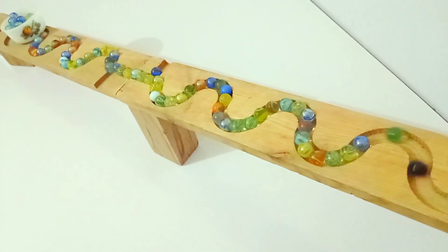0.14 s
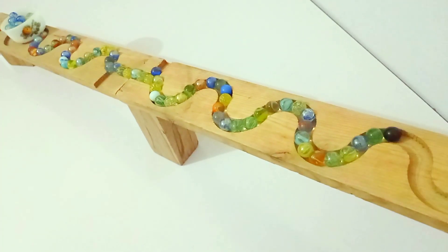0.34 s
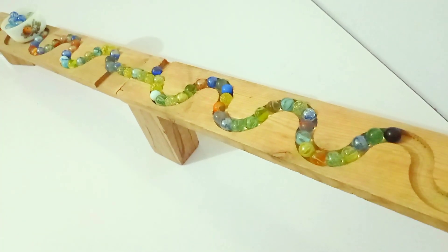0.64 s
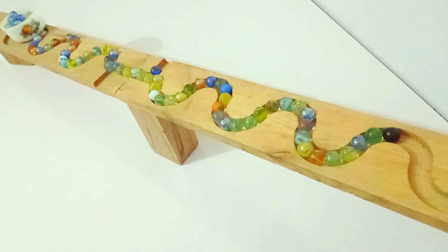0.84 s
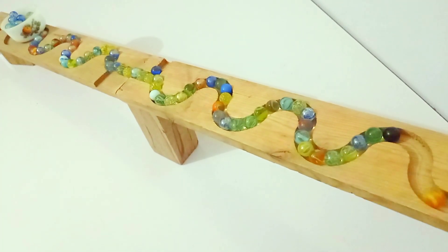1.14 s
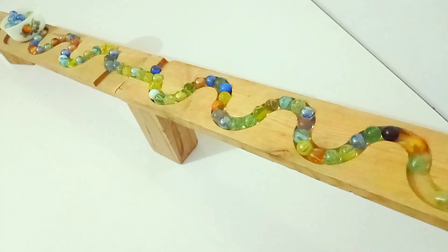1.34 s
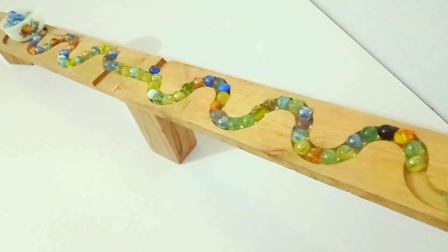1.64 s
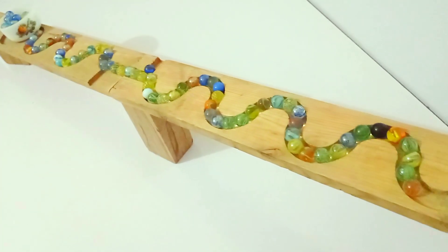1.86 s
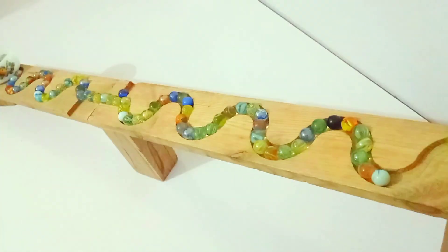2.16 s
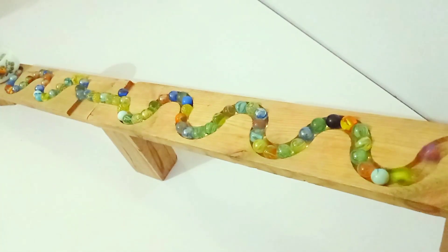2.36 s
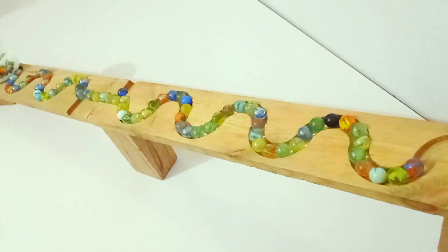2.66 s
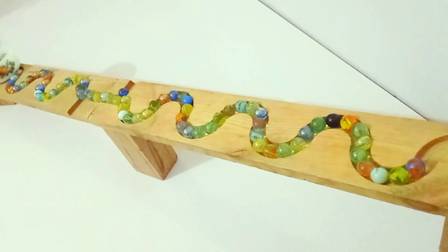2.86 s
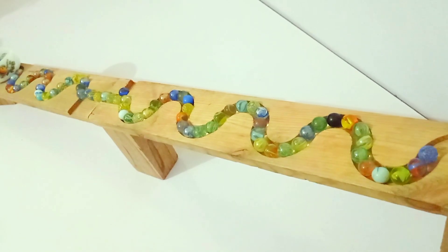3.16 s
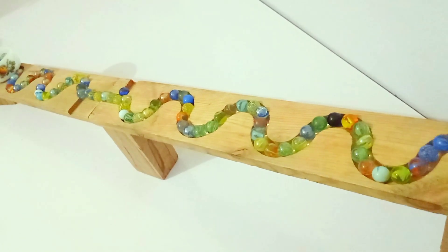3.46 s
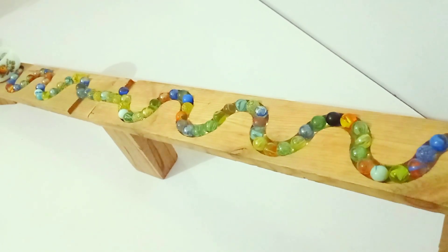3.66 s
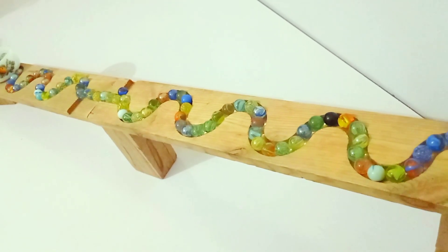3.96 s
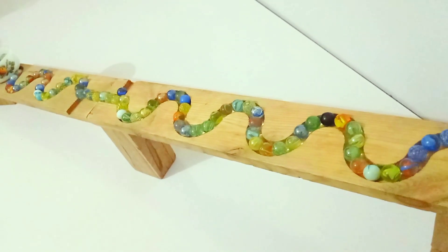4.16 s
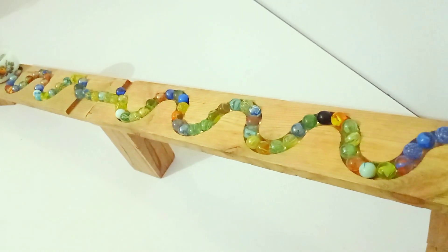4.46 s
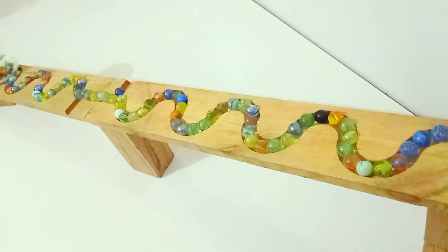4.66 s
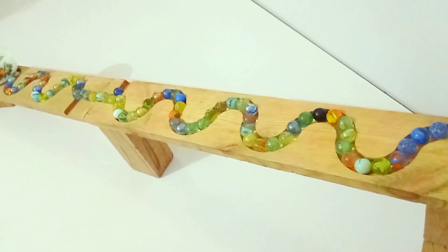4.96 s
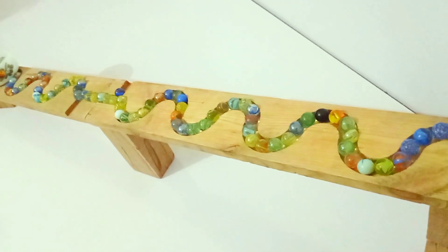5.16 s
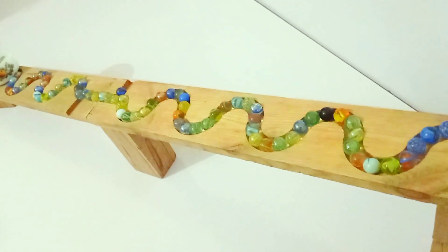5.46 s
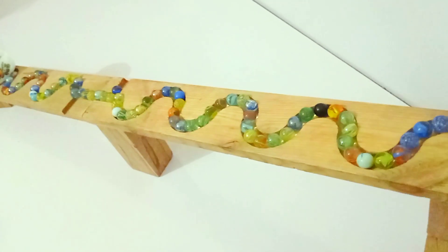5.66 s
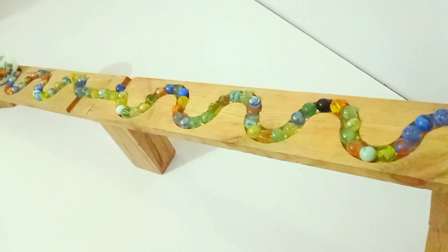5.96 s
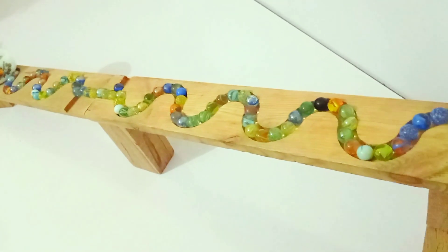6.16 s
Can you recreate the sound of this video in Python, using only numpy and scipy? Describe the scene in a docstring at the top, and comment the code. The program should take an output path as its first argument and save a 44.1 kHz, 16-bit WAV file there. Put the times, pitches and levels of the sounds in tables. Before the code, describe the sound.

Glass marbles rumble down a winding wooden groove, knocking through bends and clicking into a waiting row, before one hard clatter in a small live room.

```python
"""A small live room: glass marbles run down a winding groove in a wooden plank.
Random bumps of the grain make each run rumble; knocks in the bends ring decaying modes of the plank,
and short filtered noise bursts and snaps click where glass meets the waiting row, which then jostles.
A hard clatter ends the run. Dry bouncing ticks, a soft thud, a low rumble, a passing hum, a faint boom
and a thin hiss complete the scene."""
import sys
import numpy as np
from scipy import signal
from scipy.fft import rfft, irfft, next_fast_len
from scipy.io import wavfile
from scipy.ndimage import map_coordinates

SR = 44100
rng = np.random.default_rng(int(sys.argv[2]) if len(sys.argv) > 2 else 0)


def unload_wav(signal):
    """Save mono or channel-first audio to the path in sys.argv[1] as 16-bit WAV at rate SR, clipped to [-1, 1]."""
    wavfile.write(
        sys.argv[1],
        SR,
        np.round(np.clip(np.atleast_2d(signal).T, -1, 1) * 32767).astype(np.int16),
    )


N = 278271

# frequency balance of the room's answer: frequency_hz, level_db
WALL_SPECTRUM = [(300, 2), (700, 2.5), (2500, -1.5), (4000, -5.5), (6500, -3.5), (9000, -6), (12000, -8),
                 (15000, -13.5)]
# each marble's roll from a bend until it meets the row: start_s, end_s, start_level_db
ROLL_RUNS = [(0.585, 1.43, -54.5), (0.697, 1.47, -45), (1.203, 1.84, -51), (1.253, 2, -45.5),
             (2.149, 2.437, -52), (2.426, 2.6, -51.5), (2.7, 3.071, -54), (3.099, 3.5, -53),
             (3.54, 3.765, -51), (4.172, 4.531, -49), (4.422, 4.67, -61)]
# from here on the plank rings with a different set of mode strengths
LATER_MODES_S = 2.15


def amp(db):
    """Level law: 20 dB is a factor of ten in amplitude."""
    return 10 ** (np.asarray(db) / 20)


def unit(x):
    """Power normalisation: scale a steady sound to rms 1."""
    return x / np.sqrt(np.mean(x ** 2) + 1e-20)


def blow(x):
    """Energy normalisation: scale a short sound to the energy of one millisecond at rms 1."""
    return x / np.linalg.norm(x) * np.sqrt(SR / 1000)


def along(points, hz):
    """Interpolation of (frequency_hz, value) points on a logarithmic frequency axis."""
    f, v = np.transpose(points)
    return np.interp(np.log(hz + 1), np.log(f + 1), v)


def curve(rows, outside=None):
    """Linear interpolation of (time_s, value) rows to one value per sample."""
    return np.interp(np.arange(N) / SR, *np.transpose(rows), left=outside, right=outside)


def wobble(knots_per_s):
    """Slow random modulation: a smooth curve through Gaussian knots."""
    knots = rng.standard_normal(int(N * knots_per_s / SR) + 4)
    return map_coordinates(knots, [np.arange(N) * knots_per_s / SR])


def colour(x, spectrum, tilt=0):
    """Minimum-phase filtering: a folded cepstrum makes the spectrum, tilted in dB per octave, causal."""
    size = 2 * next_fast_len(len(x) // 2 + 2048)
    hz = np.fft.rfftfreq(size, 1 / SR)
    # the tilt pivots at 2 kHz and levels off outside 500 Hz to 9 kHz
    db = along(spectrum, hz) + tilt * np.log2(np.clip(hz, 500, 9000) / 2000)
    cepstrum = irfft(np.log(amp(db)))
    cepstrum[1:size // 2] *= 2
    cepstrum[size // 2 + 1:] = 0
    response = np.exp(rfft(cepstrum))
    return irfft(rfft(x, size) * response, size)[:len(x)]


def burst(rise, t60):
    """Transient excitation: noise that swells over rise and decays by 60 dB in t60 (both in seconds)."""
    t = np.arange(SR // 8) / SR
    swell = 1 - np.exp(-(t / rise) ** 2)
    return rng.standard_normal(len(t)) * swell * amp(-60 * t / t60)


def bumps(per_s, spread_db):
    """Random impact train: tiny impulses at random moments, of uneven size and either sign."""
    size = amp(spread_db * np.clip(rng.standard_normal(N), -2, 2)) * rng.choice([-1, 1], N)
    return (rng.random(N) < per_s / SR) * size


def room(x, wet_db, walls_db=-5, build=0.02):
    """Reverberation: the direct sound, six early reflections and a diffuse tail building over build s."""
    # reverberation time by band: frequency_hz, t60_s
    band_t60 = [(200, 0.24), (700, 0.32), (2000, 0.33), (6000, 0.34), (9000, 0.27), (15000, 0.19)]
    hz, t, z = signal.stft(rng.standard_normal(SR // 2), SR, nperseg=256)
    decay = amp(-60 * t / along(band_t60, hz)[:, None])
    tail = signal.istft(z * decay * (1 - np.exp(-(t / build) ** 2)), SR)[1]
    answer = tail / np.linalg.norm(tail)
    delays = (rng.uniform(.011, .034, size=6) * SR).astype(int)
    answer[delays] += amp(walls_db) / np.sqrt(len(delays))
    answer = amp(wet_db) * colour(answer, WALL_SPECTRUM)
    answer[0] += 1  # direct sound
    return signal.fftconvolve(x, answer)


def add(track, s, x):
    """Superposition: mix x into the track at time s."""
    start = max(round(s * SR), 0)
    track[start:start + len(x)] += x[:max(N - start, 0)]


def hiss():
    """Stationary filtered noise: a steady thin hiss."""
    # hiss spectrum: frequency_hz, level_db
    air_spectrum = [(200, -15), (340, -6), (450, -11), (700, -9.5), (800, 3), (950, -7), (1450, -2.5),
                    (1800, -7), (2200, -13), (2900, -14.5), (3700, -24.5), (5000, -27), (6200, -3),
                    (7000, -35), (9000, -55)]
    return amp(-62.5) * unit(colour(rng.standard_normal(N), air_spectrum))


def rumble():
    """Amplitude-modulated low-frequency noise: an uneven rumble."""
    # rumble level: time_s, level_db
    rumble_level = [(0, -72), (2.12, -63), (2.19, -55), (5.32, -56), (5.44, -68), (5.58, -55.5),
                    (6.2, -55.5), (6.31, -71)]
    # rumble spectrum: frequency_hz, level_db
    low_spectrum = [(20, -34), (32, -24.5), (42, -7), (58, 0), (80, -4), (105, -1.5), (130, -7.5),
                    (175, -21), (260, -40), (450, -69.5)]
    wander_db = 1
    level_db = curve(rumble_level) + wander_db * wobble(7)
    return amp(level_db) * unit(colour(rng.standard_normal(N), low_spectrum))


def hum():
    """Phase integration of a slightly wavering frequency: a hum that swells and fades."""
    # hum level, silent outside the listed times: time_s, level_db
    hum_level = [(3.1, -95), (3.8, -54.5), (4.3, -51.5), (4.7, -53), (5.3, -58), (5.5, -100)]
    hum_hz = 54.2 + .5 * wobble(1.444)
    tone = np.sqrt(2) * np.sin(2 * np.pi * np.cumsum(hum_hz) / SR)
    return amp(curve(hum_level, outside=-np.inf)) * tone


def boom():
    """Low-frequency structural vibration: noise as a faint, lumpy boom of the plank swaying on its legs."""
    # boom spectrum: frequency_hz, level_db
    boom_spectrum = [(40, -41.5), (70, -13.5), (95, 7.5), (115, 4.5), (140, -14), (220, -50)]
    base_db, wander_db = -71, 2.5
    sway_s, sway_width_s, sway_peak_db = 0.476, 0.051, 9  # one stronger sway
    sway_db = sway_peak_db * np.exp(-((np.arange(N) / SR - sway_s) / sway_width_s) ** 2)
    level_db = base_db + sway_db + wander_db * wobble(9)
    return amp(level_db) * unit(colour(rng.standard_normal(N), boom_spectrum))


def thud(s=2.088, db=-36):
    """Low-pass impact: one brief noise burst with little treble, heard as a soft bump."""
    # frequency_hz, level_db
    dull = [(150, -11), (350, 7), (520, 10), (700, 8), (1100, -12), (4000, -56)]
    track = np.zeros(N)
    bump = blow(colour(burst(rise=0.0012, t60=0.036), dull))
    add(track, s, room(amp(db) * bump, wet_db=-5))
    return track


def ticks(count=3):
    """Repeated lossy impact: dry ticks near the microphone bounce quickly, each bounce weaker."""
    # first ticks: start_s, level_db
    tick_events = [(0.6685, -31.5), (2.1566, -42), (2.303, -30), (2.3379, -40), (4.064, -30.5),
                   (4.128, -41.5), (4.1621, -38.5), (4.28, -31), (4.3458, -35.5), (4.461, -38),
                   (5.015, -61)]
    # tick spectrum: frequency_hz, level_db
    tick_spectrum = [(300, -27), (2800, -19.5), (4500, -2), (6200, 1), (7800, -18.5), (12000, -32.5),
                     (15000, -28)]
    bounce_s, loss_db = 0.0093, 9  # interval and loss per bounce
    track = np.zeros(N)
    for s, db in tick_events:
        for k in range(count):
            tick = blow(colour(burst(rise=.0001, t60=0.005), tick_spectrum))
            add(track, s + k * bounce_s, room(amp(db - k * loss_db) * tick, wet_db=-8))
    return track


def clatter():
    """Broadband impact excitation: something hard strikes and bounces, each strike a noise burst."""
    # strikes, level before the common trim: start_s, level_db, brightness_db_per_octave
    strikes = [(5.853, -18.5, 0), (5.858, -6, 0.5), (5.868, -7.5, 2), (5.871, -9, 0), (5.883, -16, -5.5),
               (5.901, -24, 3), (5.939, -11, -1), (5.956, -33, 19)]
    # strike spectrum: frequency_hz, level_db
    hard_spectrum = [(120, -25), (320, -12), (500, -9), (750, -1), (1250, -4), (2600, -3), (4700, -3.5),
                     (6400, 4), (7000, -5.5), (7700, -14.5), (11000, -24), (15300, -23), (16500, -23)]
    track = np.zeros(N)
    for s, db, tilt in strikes:
        strike = blow(colour(burst(rise=0.0016, t60=0.019), hard_spectrum, tilt))
        add(track, s, room(amp(db - 5) * strike, wet_db=-9.0))
    return track


def jostles(per_s=65, t60=0.018, rise=0.0027, scatter_db=5, uneven_db=2.5):
    """Modal synthesis of repeated contacts: marbles in the row nudge each other in tinkling bounces."""
    # spells of jostling: start_s, end_s, level_db
    spells = [(0.713, 0.989, -42.5), (1.222, 1.427, -38.5), (2.178, 2.293, -56), (2.696, 2.86, -47),
              (3.224, 3.35, -47), (3.625, 3.75, -56), (4.193, 4.335, -63)]
    # ringing modes of a nudge: frequency_hz, level_db
    row_modes = [(2750, 9), (3200, 3), (3850, -2), (4350, 6), (4600, -8.5), (5130, 3), (5450, -19)]
    track, t = np.zeros(N), np.arange(SR // 16) / SR
    hz, mode_db = np.transpose(row_modes)[:, :, None]
    envelope = amp(-60 * t / t60) * (1 - np.exp(-t / rise))
    for start, end, db in spells:
        for s in np.arange(start, end, 1 / per_s):
            strength = amp(mode_db + scatter_db * rng.standard_normal(hz.shape))
            modes = strength * np.sin(2 * np.pi * (hz * t + rng.random(hz.shape)))
            ring = blow(modes.sum(0) * envelope)
            nudge_db = db + uneven_db * rng.standard_normal()
            add(track, s + rng.random() / per_s, amp(nudge_db) * ring)
    return room(track, wet_db=-13)[:N]


def clicks():
    """Glass contact: a snap excites the room, with brief chatter and a duller shiver along the row."""
    # glass meets glass, level before the part trims: start_s, level_db, brightness_db_per_octave
    contacts = [(0.061, -24, 0), (0.085, -24.5, -0.5), (0.1647, -22, 0), (0.2527, -24.5, 0),
                (0.386, -24, 1.5), (1.4287, -27, 7), (1.469, -25.5, -2), (1.5517, -25, 2.5),
                (1.8425, -25, 2.5), (1.8595, -26, 0), (2.0136, -24.5, -1), (2.4262, -23.5, -1),
                (2.4812, -24.5, 0.5), (3.0709, -23, 0), (3.5059, -21.5, 2), (3.7685, -25, -0.5),
                (4.265, -33.5, -0.5), (4.3807, -20.5, -0.5), (4.4818, -31, 0.5), (4.5341, -28, -2),
                (4.6669, -27.5, 5)]
    # glass spectrum: frequency_hz, level_db
    glass_spectrum = [(150, -25), (350, -27), (1000, -8), (3000, -14), (4500, -7), (5400, -2), (6000, 2),
                      (6600, 1), (7500, -9.5), (9000, -18.5), (11000, -30), (13500, -31.5), (15000, -22.5),
                      (16500, -25)]
    track = np.zeros(N)
    for s, db, tilt in contacts:
        snap = blow(colour(signal.unit_impulse(SR // 8), glass_spectrum, tilt))
        chatter = blow(colour(burst(rise=.0004, t60=0.011), glass_spectrum, tilt))
        shiver = colour(burst(rise=0.003, t60=.02), glass_spectrum, tilt)
        shiver = blow(colour(shiver, WALL_SPECTRUM))
        add(track, s, amp(db - 1.26) * blow(chatter + amp(-3.5) * shiver))
        add(track, s, room(amp(db - 6) * snap, wet_db=2.5, walls_db=-11, build=0.0081))
    return track


def plank(later, rise=0.0021, scatter_db=2):
    """Modal synthesis: the plank's decaying modes, at slightly new strengths on every call."""
    # plank modes with their earlier and later strengths: frequency_hz, earlier_db, later_db, t60_s
    plank_modes = [(325, -16.5, -23, 0.04), (872, -2.5, -6, 0.022), (1230, -20, -3, 0.018),
                   (1552.5, 1, -8.5, 0.046), (1602, -23.5, -4, 0.052), (1792, -2.5, -4, 0.032),
                   (2126, 12, -25.5, 0.027), (2280, -7, 2, 0.023), (2439, -22.5, 3, 0.026),
                   (2830, -10.5, -15.5, 0.067), (2779, 3, -0.5, 0.029), (3100, -7, -19, 0.049),
                   (3570, -10, -15, 0.041), (3877, 6, -1.5, 0.013), (4310, -5, 2.5, 0.014),
                   (5420, -3.5, -6.5, 0.02), (5460, -16.5, -26, 0.013)]
    t = np.arange(SR // 8) / SR
    hz, earlier_db, later_db, t60 = np.transpose(plank_modes)[:, :, None]
    db = (later_db if later else earlier_db) + scatter_db * rng.standard_normal(hz.shape)
    modes = amp(db - 60 * t / t60) * np.sin(2 * np.pi * (hz * t + rng.random(hz.shape)))
    swell = 1 - np.exp(-(t / rise) ** 2)  # bending waves take a moment to spread
    return blow(modes.sum(0) * swell)


def roll_db():
    """Incoherent power addition: the level of all runs and of the marbles farther up the slope."""
    attack_s, slowing_db_per_s, stop_db_per_s = 0.0078, 14, 102  # swell, slowing, then dying away
    far_db, far_end_s = -69.5, 4.79  # marbles farther up, until the last has come down
    t = np.arange(N) / SR
    power = amp(far_db - stop_db_per_s * np.maximum(t - far_end_s, 0)) ** 2
    for start, end, db in ROLL_RUNS:
        age, stopped = np.maximum(t - start, 0), np.maximum(t - end, 0)
        swell = 1 - np.exp(-age / attack_s)
        run_db = db - slowing_db_per_s * age - stop_db_per_s * stopped
        power = power + (swell * amp(run_db)) ** 2
    return 10 * np.log10(power + 1e-20)


def rolling(level_db):
    """Roughness excitation: wood grain makes random bumps that ring the plank, denser for fast marbles."""
    # rolling in the groove: frequency_hz, level_db
    groove_spectrum = [(150, -43.5), (230, -15), (330, 10), (650, -1.5), (1180, 6.5), (1400, -6), (1580, 7),
                       (2300, -8), (3300, -43), (4350, -7), (4750, -25.5), (5200, -18.5), (7000, -44),
                       (10000, -69.5)]
    # fast rolling: frequency_hz, level_db
    fast_spectrum = [(150, -44), (300, -3), (500, 6), (680, -1), (1100, 2.5), (1700, -5.5), (2400, -1),
                     (3500, -23), (5500, -22), (8000, -45)]
    # the nearest marbles rolling fast, silent outside the listed times: time_s, level_db
    fast_level = [(0, -41.5), (.1, -46.5), (.22, -45), (.32, -57), (.40, -50), (.45, -76), (.55, -79)]
    surge_db = 3  # random surges as the marbles speed up and slow down in the bends
    grain = bumps(per_s=400, spread_db=4.0)
    is_later = np.arange(N) / SR > LATER_MODES_S
    ring = sum(signal.fftconvolve(grain * (is_later == later), plank(later))[:N] for later in (False, True))
    rough = unit(colour(grain, groove_spectrum)) + amp(-12.5) * unit(ring)
    slow = unit(room(rough, wet_db=-4.5)[:N])
    fast = colour(bumps(per_s=1900, spread_db=2), fast_spectrum)
    fast = unit(room(fast, wet_db=-2.0)[:N])
    slow_part = amp(level_db + surge_db * wobble(34.81)) * slow
    return slow_part + amp(curve(fast_level, outside=-np.inf)) * fast


def grazes(level_db):
    """Random light contact: touches of the wall whose level follows the rolling, as (s, dB, tilt)."""
    per_s = 16  # candidates; only those during a run are kept
    over_rolling_db, spread_db, tilt_db_per_octave = 12.5, 2.5, -4
    slots = np.arange(0, ROLL_RUNS[-1][1], 1 / per_s)
    times = slots + rng.random(len(slots)) / per_s
    touches = []
    for s in times:
        if any(start < s < end for start, end, _ in ROLL_RUNS):
            db = level_db[int(s * SR)] + over_rolling_db + spread_db * rng.standard_normal()
            touches.append((s, db, tilt_db_per_octave))
    return touches


def rebounds(count=3):
    """Restitution: each knock and its ever weaker swings from wall to wall, as (s, dB, tilt)."""
    # marbles hit the groove wall; kept_share is the strength kept at each rebound, 0 for none:
    # start_s, level_db, brightness_db_per_octave, kept_share
    wall_hits = [(0.0533, -27.5, -1.5, 0), (0.1437, -28, -4.5, 0.23), (0.595, -22, -6, 0.0067),
                 (0.6913, -10, 0.5, 0.3), (0.717, -25.5, 7, 0.0022), (0.7411, -24.5, 5.5, 0),
                 (0.8093, -24, -4.5, 0.02), (0.829, -24, -1.5, 0.26), (0.9559, -28.5, 0, 0.23),
                 (1.205, -19, -5, 0.0018), (1.2642, -16, -4, 0.0094), (1.3048, -21, -0.5, .4),
                 (1.3644, -26, 3, 0.75), (1.4336, -16, -1, 0.28), (1.6209, -33.5, 10.5, 0.00084),
                 (2.163, -27.5, 3, 0), (2.5604, -29.5, -9.5, 0.022), (2.7102, -36, -1.5, 0),
                 (2.8987, -33, 1, 0.012), (3.0977, -17.5, -5.5, 0.23), (3.2406, -32.5, -3, 0),
                 (3.3906, -39, 1.5, 0.031), (3.5454, -14, -3.5, 0.19), (3.6832, -27.5, 1.5, 0.0047),
                 (3.7375, -30.5, -4.5, 0), (4.1718, -15.5, -4, 0.012), (4.2417, -16, -1.5, 0.0018),
                 (4.296, -23, 2.5, 0.027), (4.4218, -16, -1.5, 0.0015), (4.4871, -15, -2.5, 0),
                 (4.6596, -16.5, -5, 0)]
    swing_s, rebound_tilt_db = 0.111, 2.5  # time across the groove; rebounds are brighter, per octave
    blows = []
    for s, db, tilt, kept in wall_hits:
        loss_db = 20 * np.log10(np.clip(kept, .01, 1))  # at most 40 dB is lost per swing
        for k in range(count if kept > 0 else 1):
            blows.append((s + k * swing_s, db + k * loss_db, tilt + rebound_tilt_db * (k > 0)))
    return blows


def knocks(blows):
    """Impact and modal response: a marble chatters against the wall of a bend and rings the plank."""
    # wood chatter: frequency_hz, level_db
    wood_spectrum = [(150, -58.5), (300, -11), (550, -16), (900, -2.5), (2500, 6), (3300, -2), (5500, -7),
                     (7000, -21), (9000, -53), (14000, -57.5)]
    track = np.zeros(N)
    for s, db, tilt in blows:
        chatter = blow(colour(burst(rise=0.0027, t60=0.02), wood_spectrum))
        knock = plank(s > LATER_MODES_S, rise=0.0025) + amp(-2.0) * chatter
        knock = blow(colour(knock, [(1000, 0)], tilt))  # flat apart from the tilt
        add(track, s, room(amp(db) * knock, wet_db=-8.5, walls_db=-2, build=0.019))
    return track


def scene():
    """Superposition of all sources at one microphone."""
    level_db = roll_db()
    background = hiss() + rumble() + hum() + boom()
    others = thud() + ticks() + clatter()
    marbles = jostles() + clicks() + rolling(level_db) + knocks(grazes(level_db)) + knocks(rebounds())
    return (background + others + marbles)[None]


def record(dry):
    """Band limiting: a steep low-pass filter leaves almost nothing above its stopband edge."""
    stopband_hz = 16900
    return signal.sosfilt(signal.cheby2(14, 70, stopband_hz, fs=SR, output="sos"), dry)


dry = scene()
out = record(dry)
unload_wav(out)
```